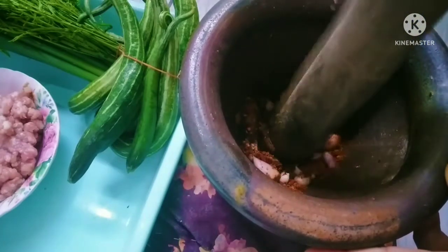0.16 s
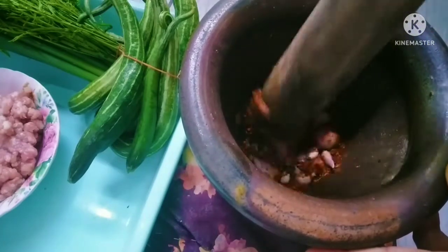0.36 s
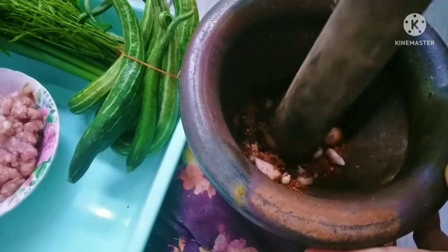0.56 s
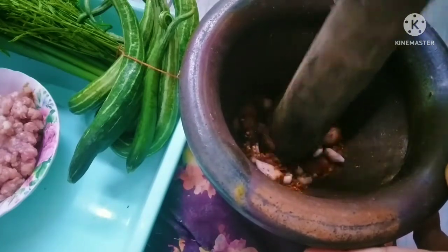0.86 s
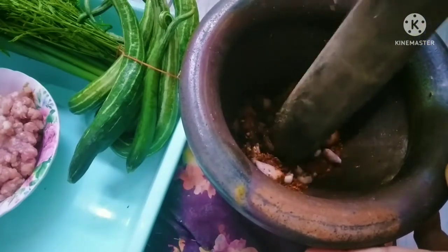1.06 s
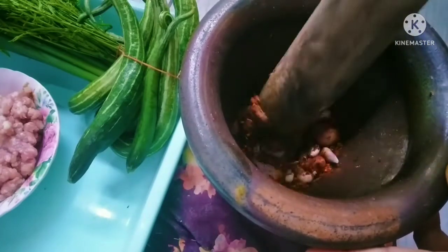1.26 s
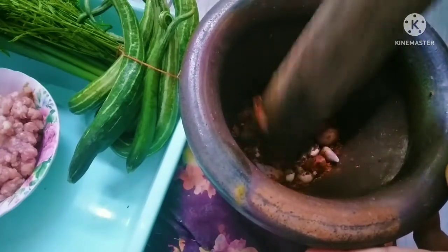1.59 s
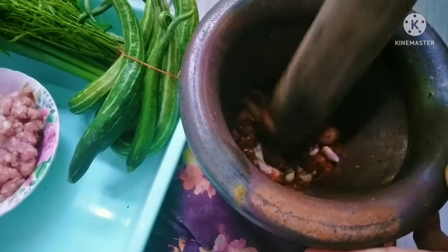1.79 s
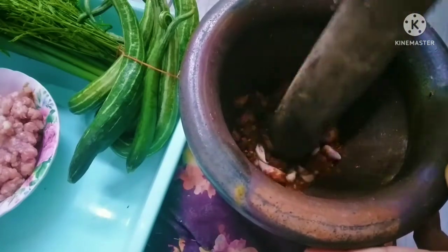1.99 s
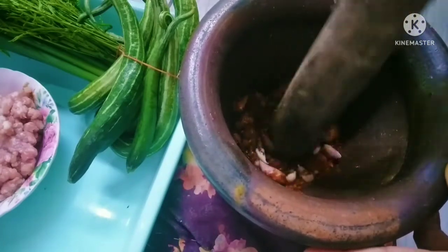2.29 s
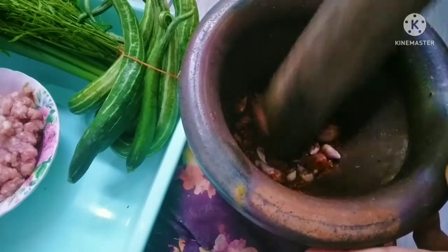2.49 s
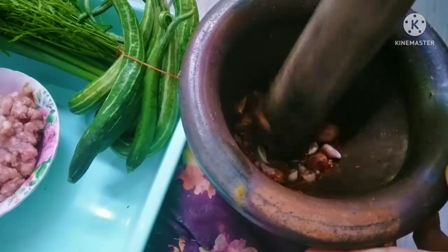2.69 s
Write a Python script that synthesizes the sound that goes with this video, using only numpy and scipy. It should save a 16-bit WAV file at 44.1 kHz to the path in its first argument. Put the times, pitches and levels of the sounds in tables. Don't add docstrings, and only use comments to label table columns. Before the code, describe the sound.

Steady mortar and pestle pounding, nine crunchy thuds on clay, with faint sparrows chirping outside

```python
import sys
import numpy as np
from scipy import signal
from scipy.fft import rfft, irfft
from scipy.io import wavfile
from scipy.ndimage import uniform_filter1d

SR = 44100
rng = np.random.default_rng(int(sys.argv[2]) if len(sys.argv) > 2 else 0)


def volts_from_db(level):
    exponent = np.asarray(level, float) / 20
    return 10 ** exponent


def wav_record(signal):
    frames = np.transpose(np.atleast_2d(signal))
    bounded = np.clip(frames, -1, 1)
    quanta = np.round(bounded * 32767).astype(np.int16)
    wavfile.write(sys.argv[1], SR, quanta)


N = 125685

# (time [s], thud level [dB])
STRIKES = [
    (.2057, 1),
    (.5002, 1),
    (.8005, -1.5),
    (1.0960, 0),
    (1.3897, -.5),
    (1.6836, 0),
    (1.9803, .7),
    (2.2790, 1),
    (2.5732, .3),
]
# (knock pitch [Hz], knock level [dB], bowl ring level [dB])
KNOCKS = [(351, -27.5, -27.5), (627, -27, -32), (752, -24.5, -26.5), (600, -21, -24.5), (602, -30, -30.5),
          (602, -25.5, -24.5), (609, -24.5, -26.5), (643, -27, -22), (588, -16.5, -16)]
# (slap level [dB], crunch level [dB], crush length [s], scrape level [dB])
BLOWS = [(-28, -28.5, 0.0064, -20), (-24.5, -29, .008, -18), (-22.5, -30, 0.0097, -10),
         (-24, -24.5, 0.0088, -19.5), (-40, -24.5, 0.0027, -13), (-24, -23.5, .01, -18.5),
         (-20.5, -26, .008, -25), (-18, -25.5, .006, -18.5), (-13.5, -16.5, 0.0051, -32.5)]
# (frequency [Hz], level [dB], decay T60 [s], sign [+1 or -1])
THUD_MODES = [(34.5, -30.9, 0.224, 1), (50.1, -24.2, 0.344, 1), (54.6, -32.1, 0.9, 1),
              (62.8, -18.3, 0.309, -1), (85.0, -15.0, 0.068, 1), (102.5, -14.5, 0.088, -1),
              (131.0, -18.2, 0.123, -1), (139.9, -26.5, 0.566, 1), (154.4, -38.3, 0.861, 1),
              (169.2, -27.4, 0.42, -1), (197.7, -20.9, 0.242, -1), (193.6, -11.7, 0.059, 1),
              (250.1, -27.7, 0.073, -1), (293.4, -34.1, 0.05, -1)]
# (frequency [Hz], level [dB], decay T60 [s])
CLAY_MODES = [(274, -12.5, 0.36), (337, -3.5, 0.031), (396, -10, .14), (434.5, -8, 0.15),
              (575, -24.5, 0.42), (906, -9, 0.028)]
# (frequency [Hz], width [Hz], level [dB])
CRUNCH_BANDS = [(1546, 1340, -3), (2500, 1330, -1), (4020, 850, -6), (5420, 1300, -11.5), (7380, 1600, -9),
                (10200, 5800, -20.5), (14200, 3400, -22)]
# (time [s], level [dB])
CRUMBS = [(0.609, -54), (1.071, -52), (1.126, -46), (1.415, -39), (1.8, -46.5), (2.109, -60.5),
          (2.399, -57), (2.45, -52.5), (2.49, -52), (2.845, -49)]
# (frequency [Hz], decay T60 [s])
KITCHEN_DECAY = [(300, 0.51), (1500, 0.35), (4000, 0.39), (12000, 0.067)]
# (start [s], length [s], level [dB], start pitch [Hz], pitch fall [Hz])
CHIRPS = [
    (0.279, 0.1, -60, 5900, 400),
    (1.24, 0.24, -64, 5930, 300),
    (1.932, 0.097, -60.5, 6060, 300),
    (2.421, 0.2, -73, 7150, 201),
    (2.62, 0.12, -60, 5900, 600),
    (2.759, 0.13, -60.5, 6070, 700),
]
# (frequency [Hz], density [dB per Hz])
RUMBLE = [(25, -22.5), (60, 12), (95, -15), (155, -7), (230, -25.5), (650, -33.5), (1200, -38), (2500, -87)]
# (frequency [Hz], density [dB per Hz])
HISS = [(410, -68), (700, -21), (970, -16.5), (1430, -3), (1810, -2), (7320, -8), (10700, -23),
        (15200, -32.5), (15800, -41)]
# (time [s], level [dB])
BUSTLE = [(0, -2), (.6, 0), (1., -3), (1.3, 0), (1.6, -0.5), (1.85, -1), (2.2, -0.5), (2.5, 2.5),
          (2.72, -1), (2.76, -4), (2.85, -2)]
# (frequency [Hz], left-right correlation [-1 to 1])
LIKENESS = [(60, 0.96), (240, 1), (950, -0.03), (3770, 0.14), (15000, -0.79)]
# (frequency [Hz], left over right [dB])
PORT_BALANCE = [(60, 1.5), (130, -2), (290, 2), (640, -2.5), (1410, 0.5), (3100, 2.5), (6820, 4.5),
                (15000, -3)]
# (frequency [Hz], width [Hz], level [dB])
LEFT_PEAK = (7480, 1250, 5.6)
# (frequency [Hz], width [Hz], level [dB])
RIGHT_PEAK = (10800, 1930, 6.8)
# (from [s], to [s])
GATE_SHUT = [(.075, .19), (.4, .484), (.62, .782), (.925, .985), (1.89, 1.94), (2.14, 2.264)]

THUD_LEAD_S, CLAY_LEAD_S, CRUNCH_END_S = 0.0061, 0.004, 0.003
CRUNCH_PEAK_S = 0.04


def evened(x):
    return x / np.sqrt(np.mean(x ** 2) + 1e-20)


def read(points, hz):
    f, value = np.transpose(points)
    return np.interp(np.log(hz + 1), np.log(f + 1), value)


def add(mix, s, sound):
    part = mix[..., round(s * SR):][..., :sound.shape[-1]]
    part += sound[..., :part.shape[-1]]


def resonate(x, hz, width):
    turn = np.exp(2j * np.pi * np.cumsum(hz * np.ones(x.shape[-1])) / SR)
    r = np.exp(-np.pi * width / SR)
    return 2 * (turn * signal.lfilter([1 - r], [1, -r], x / turn)).real


def thud(db, slap_db):
    slap_s, slap_lead_s, usual_slap_db = 0.00088, 0.0011, -24
    t = np.arange(SR // 2) / SR
    stretch = 1 + 0.005 * rng.standard_normal()
    modes = sum(sign * volts_from_db(db + level - 60 * t / t60) * np.sin(2 * np.pi * f * stretch * t)
                for f, level, t60, sign in THUD_MODES)
    u = (t - THUD_LEAD_S + slap_lead_s) / slap_s
    slap = u * np.exp(-u * u / 2)
    return modes + (volts_from_db(slap_db) - volts_from_db(usual_slap_db)) * slap


def clay(knock_hz, knock_db, ring_db):
    clay_db, vary_db, knock_t60, attack_s = -8, 1.5, 0.032, 0.0013
    t = np.arange(SR // 4) / SR
    ring = np.zeros(len(t))
    for f, level, t60 in CLAY_MODES:
        louder, sharper = rng.standard_normal(2)
        envelope = volts_from_db(ring_db + clay_db + level + vary_db * louder - 60 * t / t60)
        ring += envelope * np.sin(2 * np.pi * f * (1 + 0.006 * sharper) * t)
    knock = volts_from_db(knock_db - 60 * t / knock_t60) * np.sin(2 * np.pi * knock_hz * t)
    return (ring + knock) * np.minimum(t / attack_s, 1)


def crunch(db, length, scrape_db):
    crunch_db, grits_per_s, scrape_s = -1, 15000, 0.023
    fall_s, settle_db, settle_s = 0.0022, -19.5, 0.024
    t = np.arange(SR // 5) / SR - CRUNCH_PEAK_S
    cracks = rng.random(len(t)) < grits_per_s / SR
    grit = np.sign(rng.random(len(t)) - 0.5) * cracks
    grit = evened(grit) + 0.5 * rng.standard_normal(len(t))

    scrape = volts_from_db(scrape_db) * np.clip(3 * (1 + t / scrape_s), 0, 1)
    rise = (np.clip(1 + t / length, 0, 1) ** 1.06 + scrape) * (t <= 0)
    settle = volts_from_db(settle_db) * np.exp(-abs(t) / settle_s)
    fall = (t > 0) * (np.exp(-abs(t) / fall_s) + settle)
    drive = grit * (rise + fall)

    body = np.zeros(len(t))
    for k, (f, width, level) in enumerate(CRUNCH_BANDS):
        hz = f * (1 + 0.052 * rng.standard_normal())
        band = resonate(resonate(drive, hz, width), hz, 1.7 * width)
        body += (-1) ** k * volts_from_db(level) * band / np.sqrt(width / SR)
    return volts_from_db(db + crunch_db) * body / 5.44


def kitchen(x):
    taps = np.zeros((2, SR // 2))
    at = np.arange(120, SR // 2 - 20, 20)
    at = at + rng.integers(0, 20, (2, len(at)))
    np.put_along_axis(taps, at, rng.choice([-1., 1.], at.shape), 1)
    hz, t, z = signal.stft(taps, SR, nperseg=256)
    decay = volts_from_db(-60 * t / read(KITCHEN_DECAY, hz)[:, None])
    tail = signal.istft(z * decay, SR, nperseg=256)[1]
    return signal.fftconvolve(x[None], tail / np.linalg.norm(tail[0]), axes=1)[:, :N]


def chirp(length, db, hz, fall_hz):
    width_hz, warble_hz, warbles_per_s = 1000, 120, 22
    t = np.arange(0, length, 1 / SR)
    pitch = hz - fall_hz * t / length + warble_hz * np.sin(2 * np.pi * warbles_per_s * t)
    air = rng.standard_normal((2, SR // 4))[:, :len(t)]
    air = air + 0.2 * air[::-1]
    tone = resonate(resonate(air, pitch, width_hz), pitch, width_hz)
    return volts_from_db(db) * evened(tone) * np.sin(np.pi * (t / length) ** 0.48) ** 0.65


def noise(shape, db, patchy_db, flicker_db):
    frames, hz = N // 256 + 5, np.fft.rfftfreq(1024, 1 / SR)
    a, b, c, d, patches = rng.standard_normal((frames, 513, 5)).T
    patches = uniform_filter1d(uniform_filter1d(patches, size=10, axis=0), size=10, axis=1)
    flicker = uniform_filter1d(rng.standard_normal(frames), size=4)
    same = np.clip(read(LIKENESS, hz), -1, 1)[:, None]
    left = a + 1j * b
    right = same * left + np.sqrt(1 - same ** 2) * (c + 1j * d)
    level = read(shape, hz)[:, None] + patchy_db * evened(patches) + flicker_db * evened(flicker)
    z = np.array([left, right]) * volts_from_db(level)
    return volts_from_db(db) * evened(signal.istft(z, nperseg=1024, noverlap=768)[1][:, :N])


def background():
    rumble = noise(RUMBLE, -41.5, patchy_db=1.0, flicker_db=1.6)
    hiss = noise(HISS, -61, patchy_db=2.2, flicker_db=1.15)
    bustle = volts_from_db(np.interp(np.arange(N) / SR, *np.transpose(BUSTLE)))
    return rumble + bustle * hiss


def scene():
    low, bowl, high = np.zeros((3, N))
    birds = np.zeros((2, N))
    for (s, thud_db), knock, (slap_db, *crush) in zip(STRIKES, KNOCKS, BLOWS):
        add(low, s - THUD_LEAD_S, thud(thud_db, slap_db))
        add(bowl, s - CLAY_LEAD_S, clay(*knock))
        add(high, s - CRUNCH_END_S - CRUNCH_PEAK_S, crunch(*crush))
    for s, db in CRUMBS:
        add(high, s - CRUNCH_PEAK_S, crunch(db, length=0.0033, scrape_db=-21))
    for s, *row in CHIRPS:
        add(birds, s, chirp(*row))
    rim = volts_from_db(-8.5) * np.roll(high, shift=19) * np.array([[1.], [-1.]])
    placed_bowl = bowl * volts_from_db(np.array([[-2], [0]]))
    room = volts_from_db(-15) * kitchen(high + bowl)
    return low + high + rim + placed_bowl + room + birds + background()


def microphone_ports(dry, hz):
    lean = read(PORT_BALANCE, hz) / 2
    left_peak, right_peak = (level * np.exp(-((hz - f) / width) ** 2)
                             for f, width, level in (LEFT_PEAK, RIGHT_PEAK))
    left = volts_from_db(lean + 0.99 * left_peak - 0.41 * right_peak)
    right = volts_from_db(-lean + 2.1 * right_peak - 0.37 * left_peak)
    lag = np.exp(-2j * np.pi * hz * 2.6e-5) * np.exp(0.12j * np.log(hz / 40 + 1))
    return rfft(dry) * np.array([left, right * lag]) * (hz < 15750)


def noise_gate(z, hz):
    shut_db, gate_hz, slope_s = -24.5, 935, 0.024
    treble = irfft(z / (1 + (gate_hz / (hz + 1)) ** 4), N)
    t = np.arange(N) / SR
    shut = sum(np.clip(np.minimum(t - a, b - t) / slope_s + 0.5, 0, 1) for a, b in GATE_SHUT)
    return irfft(z, N) - treble * (1 - volts_from_db(shut_db * shut))


def top_cut(x):
    return signal.sosfilt(signal.butter(12, 15970, fs=SR, output="sos"), x)


def record(dry):
    hz = np.fft.rfftfreq(N, 1 / SR)
    mix = noise_gate(microphone_ports(dry, hz), hz)
    return top_cut(mix)


dry = scene()
out = record(dry)
wav_record(out)
```